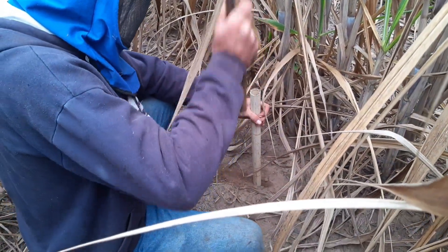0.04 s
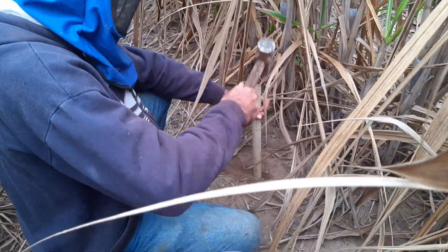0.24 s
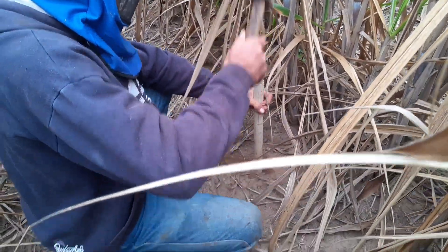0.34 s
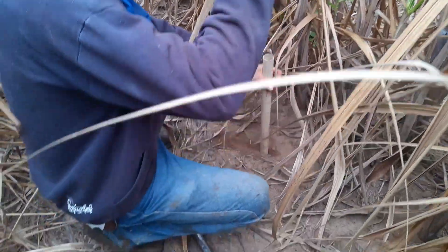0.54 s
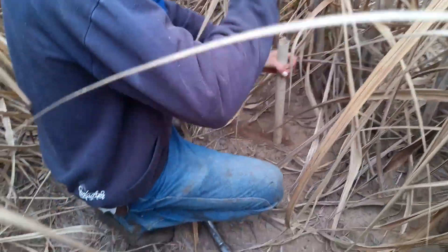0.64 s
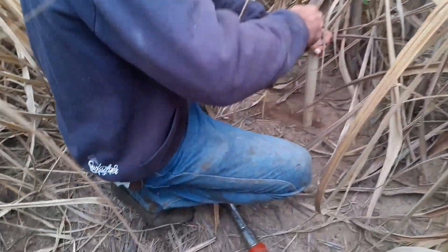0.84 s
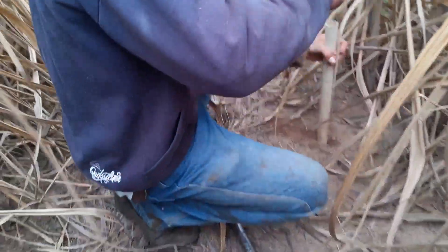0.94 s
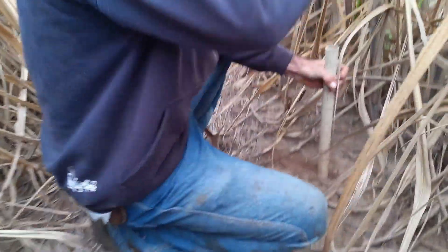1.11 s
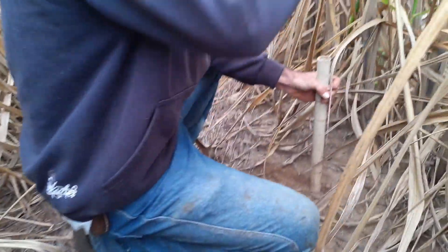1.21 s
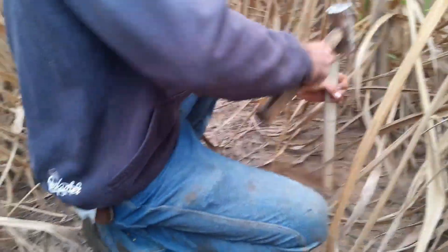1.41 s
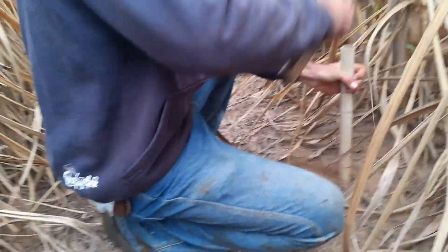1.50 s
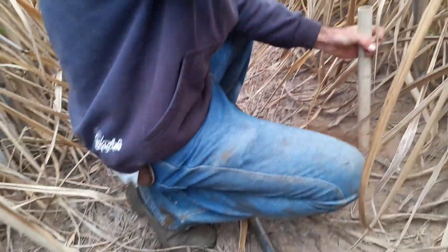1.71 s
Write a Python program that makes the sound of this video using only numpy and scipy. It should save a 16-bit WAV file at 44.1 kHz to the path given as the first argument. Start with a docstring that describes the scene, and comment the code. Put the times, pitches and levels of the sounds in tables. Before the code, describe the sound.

Three loud, evenly spaced hammer blows on a plastic pipe, close to the microphone, each a hard crack with brief hollow ring and ground thump; light taps and dry leaf rustle between, in a quiet open field.

```python
"""Quiet open air in a field, with a faint wavering low hum, like a distant engine, under everything.
A plastic sampling pipe is hammered into the soil with three sharp blows, close to the microphone.
Each blow cracks, rings the pipe briefly and thumps the ground, and dry cane scatters the sound.
Between blows come light taps, and leaves and clothing brush by in swells, strongest before blows two
and three; most of the pipe's modes sit higher at each blow as it sinks and fills."""
import sys
import numpy as np
from scipy import signal
from scipy.fft import rfft, irfft
from scipy.io import wavfile

SR = 44100
rng = np.random.default_rng(int(sys.argv[2]) if len(sys.argv) > 2 else 0)


def to_wav(s):
    """Save 16-bit WAV."""
    ch = np.atleast_2d(s).T  # columns
    pcm = np.round(np.clip(ch, -1, 1) * 32767)  # PCM
    wavfile.write(sys.argv[1], SR, pcm.astype(np.int16))


N = 77175
TIME = np.arange(N) / SR  # s, the whole scene
T = np.arange(int(SR * 0.4)) / SR  # s, from the start of one blow or tap

# stereo balance of blows and taps: (frequency [Hz], left minus right [dB])
STRIKE_BALANCE = [(150, -1), (300, -0.3), (480, -2.5), (750, -2.5), (1350, -8), (2200, 1.5), (2900, -4.5),
                  (3500, 3), (4700, 0.5), (6000, -1), (9000, 9.5), (15000, 7.5)]


def amp(db):
    """Decibels to amplitude."""
    return 10 ** (np.asarray(db) / 20)


def unit(x):
    """Scale to an rms of 1."""
    return x / np.sqrt(np.mean(x ** 2) + 1e-20)


def read(points, hz):
    """A table's value on a log-frequency axis."""
    f, value = np.transpose(points)
    return np.interp(np.log(hz + 1), np.log(f + 1), value)


def level_over_time(points):
    """A level in dB at every sample, straight lines between the table's points."""
    return np.interp(TIME, *np.transpose(points))


def freqs(x):
    """The frequencies of the spectrum of x, in Hz."""
    return np.fft.rfftfreq(x.shape[-1], 1 / SR)


def shaped(x, gain):
    """Multiply the spectrum of x by a gain."""
    return irfft(rfft(x) * gain, x.shape[-1])


def panned(points, hz):
    """Left and right gains from a table of level differences, with equal total power."""
    gains = amp(np.array([[0.5], [-0.5]]) * read(points, hz))
    return gains / np.sqrt(np.mean(gains ** 2, 0))


def add(mix, start_s, sound):
    """Lay a sound into the mix, cut off at the end of the scene."""
    part = mix[:, round(start_s * SR):][:, :sound.shape[-1]]
    part += sound[..., :part.shape[-1]]


def wander(rate_hz, size):
    """Random drift of rms 1, no faster than about rate_hz."""
    x = rng.standard_normal(N)
    return unit(shaped(x, np.exp(-(freqs(x) / rate_hz) ** 2)))[:size]


def dying(t60):
    """Exponential decay by 60 dB in t60 seconds."""
    return np.exp(-np.log(1000) * T / t60)


def tilted(db, tilt_db, hz):
    """Amplitude of a level tilted by tilt_db per octave around 2500 Hz."""
    return amp(db + tilt_db * np.log2(hz / 2500))


def burst(bands, tilt_db, own):
    """Two channels of noise, an amplitude share own apart; bands start together and die separately."""
    z = rng.standard_normal((3, len(T)))
    z = np.sqrt(1 - own ** 2) * z[2] + own * z[:2]
    hz = freqs(z)
    centres = [band[0] for band in bands]
    low_cut = 1 / (1 + (centres[0] / 2 / (hz + 1)) ** 4)
    out = 0
    for pick, (f, db, t60) in zip(np.eye(len(bands)), bands):
        # each band is a triangle reaching to its neighbours' centres
        triangle = read(list(zip(centres, pick)), hz)
        band = unit(shaped(z, triangle * low_cut))
        out = out + band * tilted(db, tilt_db, f) * dying(t60)
    return out


def open_air():
    """Quiet open air: steady noise, mostly low and mostly shared by the two channels."""
    # spectrum of the air: (frequency [Hz], relative level [dB per Hz])
    air_colour = [(20, -3), (45, 2), (130, -5.5), (220, -8), (500, -13), (1500, -15.5), (4000, -25),
                  (15000, -53.5)]
    air_db = -70  # rms
    z = rng.standard_normal((3, N))
    air = z[2] + 0.32 * z[:2]
    return amp(air_db) * unit(shaped(air, amp(read(air_colour, freqs(air)))))


def low_hum():
    """A central sine, like a distant engine, that wavers in pitch and level."""
    # hum before its waver: (time [s], rms level [dB])
    hum_level = [(0, -68), (.2, -62.5), (.32, -73.5), (.78, -64.5), (.95, -74), (1.25, -67.5), (1.42, -69),
                 (1.62, -84.5), (1.75, -71.5)]
    centre_hz, waver_hz, waver_db = 87, 2.5, 1  # both wavers are rms
    pitch_hz = centre_hz + waver_hz * wander(25, size=N)
    hum = np.sqrt(2) * np.sin(2 * np.pi * np.cumsum(pitch_hz) / SR)
    return hum * amp(level_over_time(hum_level) + waver_db * wander(17, size=N))


def brushing():
    """Dry leaves and cloth slide close by: a fine-grained noise hiss that swells with each swing."""
    # swells of the brushing: (time [s], rms level [dB])
    swells = [(0, -74), (.2, -74), (.38, -84.5), (.46, -66.5), (.58, -61.5), (.63, -51), (.69, -51),
              (.79, -47.5), (.83, -45), (.92, -57), (1.05, -56), (1.225, -56), (1.26, -48.5), (1.33, -44.5),
              (1.4, -39.5), (1.455, -39.5), (1.51, -67), (1.56, -64), (1.64, -57.5), (1.69, -61),
              (1.75, -56)]
    # its spectrum: (frequency [Hz], relative level [dB per Hz])
    colour = [(60, -14.5), (130, -9.5), (240, -3), (600, -6.5), (1000, -3), (1550, 0.5), (2200, -3),
              (3200, -3), (5500, -2), (9500, -.5), (12300, -5), (15400, -18.5), (16200, -28)]
    # its stereo balance: (frequency [Hz], left minus right [dB])
    balance = [(100, -3.5), (700, 1.5), (1290, -6), (2380, -2.5), (4400, 3.5), (8120, 8.5), (15000, 14)]
    # likeness of the channels: (frequency [Hz], left-right correlation [-1 to 1])
    likeness = [(100, .92), (290, 0.88), (640, 0.43), (1410, -0.14), (3100, 0.61), (7000, -0.16)]
    grain_db, flutter_db = 2.0, 1.22  # rms of the fast and the slower level changes
    roughness_db = grain_db * wander(900, size=N) + flutter_db * wander(45, size=N)
    z = rng.standard_normal((2, N)) * amp(roughness_db)
    hz = freqs(z)
    same = read(likeness, hz)
    right = shaped(z[0], same) + shaped(z[1], np.sqrt(1 - same ** 2))
    hiss = shaped(np.array([z[0], right]), amp(read(colour, hz)) * panned(balance, hz))
    return unit(hiss) * amp(level_over_time(swells))


def taps():
    """Light touches of hand, tool and cane around the blows: short bursts of noise."""
    # touches: (time [s], level [dB], t60 [s], brightness [dB per octave])
    touches = [(.008, -55.5, 0.053, 4), (.297, -62, 0.117, 8.5), (.396, -53, 0.031, -1.5),
               (.411, -65, 0.075, 5), (.553, -58, 0.016, 3.5), (1.036, -50, .03, 3),
               (1.058, -50.5, 0.025, 2.5), (1.111, -51, 0.012, -1.5), (1.505, -49, 0.032, 1.5)]
    # spectrum shared by the touches: (frequency [Hz], band level [dB])
    touch_bands = [(800, -5.5), (2200, -6), (4500, -8.5), (9000, -11.5), (12500, -16), (15500, -45)]
    out = np.zeros((2, N))
    for start_s, db, t60, tilt_db in touches:
        bands = [(f, band_db, t60) for f, band_db in touch_bands]
        add(out, start_s, amp(db) * burst(bands, tilt_db, own=0.98))
    return shaped(out, panned(STRIKE_BALANCE, freqs(out)))


def cane_scatter():
    """Dry cane scatters the blow: noise that lingers after the crack, softly started."""
    # scattered sound: (frequency [Hz], band level [dB], t60 [s])
    scatter_bands = [(170, -53, 0.33), (400, -48.5, 0.064), (815, -51, .15), (1820, -38, 0.11),
                     (3300, -30, .105), (5550, -34.5, 0.11), (10000, -42.5, 0.17), (15500, -54, .1)]
    rise_s = 0.002
    return burst(scatter_bands, 0, own=0.63) * np.minimum(T / rise_s, 1)


def hammer_ring():
    """A faint, fuzzy high ring of the steel head, swelling as it lifts off."""
    ring_hz, width_hz, rise_s, t60 = 11880, 130, 0.05, 0.2
    turn = 2 * np.pi * ring_hz * T
    # two random drifts on sine and cosine blur the tone into a narrow band
    fuzz = wander(width_hz, size=len(T)) * np.sin(turn)
    fuzz = fuzz + wander(width_hz, size=len(T)) * np.cos(turn)
    return unit(fuzz) * np.minimum(T / rise_s, 1) * dying(t60)


def thump(hz, db, rise_s, delay_s):
    """A heavily damped low swing whose envelope crests rise_s after the delay."""
    t = np.maximum(T - delay_s, 0)
    swing = t / rise_s * np.exp(0.5 - 0.5 * (t / rise_s) ** 2)
    return amp(db) * swing * np.sin(2 * np.pi * hz * t)


def soil_knock(knock_db):
    """The dull knock of the pipe in the soil: damped low swings just after the crack."""
    # swings of the knock: (frequency [Hz], level before the blow's own [dB], time to the crest [s])
    swings = [(236, -20, 0.0041), (178.2, -39.5, 0.014)]
    return sum(thump(hz, db + knock_db, rise_s, delay_s=0.0022) for hz, db, rise_s in swings)


def ground_thump(ground_db):
    """The ground takes the blow: one deep damped swing."""
    return thump(85, -36 + ground_db, rise_s=0.0095, delay_s=0.002)


def pipe(depth, tilt_db):
    """The pipe's hollow ring, kept short by hand and soil; modes shift in pitch and weight as it sinks."""
    # modes: (start [Hz], full depth [Hz], start [dB], full depth [dB], t60 before the cap below [s])
    modes = [(450, 430, -25.5, -29, 0.044), (694, 814, -12, -8.5, 0.026), (1130, 1221, -17.5, -5.5, .018),
             (1394, 1730, -12, -12.5, 0.021), (1750, 1900, -15, -18.5, .034),
             (2149, 2390, -8.5, -28.5, 0.023), (2480, 3005, -14.5, -8.5, 0.023),
             (2933, 3420, -8.5, -11.5, 0.022), (3226, 3912, -9, -22, 0.019),
             (3714, 13000, -23, -26.5, 0.018), (4500, 6400, -22, -15, 0.035),
             (4540, 5954, -18.5, -20.5, 0.072), (6040, 6533, -17, -17.5, .025)]
    rise_s, spread_s, longest_t60 = 0.00074, 0.00094, 0.04
    out = 0
    for top_hz, deep_hz, top_db, deep_db, t60 in modes:
        hz = top_hz + depth * (deep_hz - top_hz)
        db = top_db + depth * (deep_db - top_db)
        # low modes arrive later; those above 4 kHz start already under way
        t = np.maximum(T - spread_s * (np.sqrt(1000 / hz) - 0.5), 0)
        swell = 1 - np.exp(-t / rise_s)
        ring = swell * dying(min(t60, longest_t60)) * np.sin(2 * np.pi * hz * t)
        out = out + tilted(db, tilt_db, hz) * ring
    return out


def hammer_crack(tilt_db):
    """The crack of hammer on pipe: a noise burst with a very fast start."""
    # crack: (frequency [Hz], band level before the blow's brightness [dB], t60 [s])
    crack_bands = [(300, -39, 0.084), (830, -33, 0.0067), (1630, -18.5, 0.025), (2900, -10.5, .022),
                   (5200, -15.5, 0.044), (8000, -19, 0.023), (10200, -24, 0.045), (15200, -35.5, 0.026)]
    rise_s = 0.0004
    return burst(crack_bands, tilt_db, own=0.7) * np.minimum(T / rise_s, 1)


def blows():
    """Each blow sums crack, cane scatter, pipe ring, soil knock, ground thump and hammer ring."""
    # blows: (time [s], pipe [dB], crack and scatter [dB], brightness of crack and pipe [dB per octave],
    # knock [dB], ground [dB], hammer ring [dB])
    strikes = [(0.2162, 3.5, -1, 0.05, -3, -9.5, -39.5), (0.8318, -0.5, 1, -1, -3.5, -0.5, -41.5),
               (1.4603, -.5, 0, 0, -7.5, 2.5, -47.5)]
    low_cut_hz, left_lag_s = 55, 0.00008
    out = np.zeros((2, N))
    depths = np.linspace(0, 1, len(strikes))  # 0 at the first blow, 1 at full depth
    for depth, strike in zip(depths, strikes):
        start_s, pipe_db, crack_db, tilt_db, knock_db, ground_db, ring_db = strike
        blow = amp(crack_db) * (hammer_crack(tilt_db) + cane_scatter())
        blow = blow + amp(pipe_db) * pipe(depth, tilt_db)
        blow = blow + soil_knock(knock_db) + ground_thump(ground_db)
        blow = blow + amp(ring_db) * hammer_ring()
        add(out, start_s, blow)
    low_cut = signal.butter(2, low_cut_hz, "high", fs=SR, output="sos")
    out = signal.sosfilt(low_cut, out)
    hz = freqs(out)
    # the left channel hears each blow slightly later
    lag = np.exp(-2j * np.pi * hz * left_lag_s * np.array([[1], [0]]))
    return shaped(out, panned(STRIKE_BALANCE, hz) * lag)


def scene():
    """The field, the brushing, the taps and the blows together."""
    return open_air() + low_hum() + brushing() + taps() + blows()


def record(dry):
    """The loudest peaks round off against a ceiling of 1; then the treble is cut at the band limit."""
    edge_hz = 16300
    held = dry / (1 + dry ** 6) ** (1 / 6)
    band_limit = signal.firwin(255, edge_hz, window=("kaiser", 9), fs=SR)
    return signal.oaconvolve(held, band_limit[None], "same")


dry = scene()
out = record(dry)
to_wav(out)
```